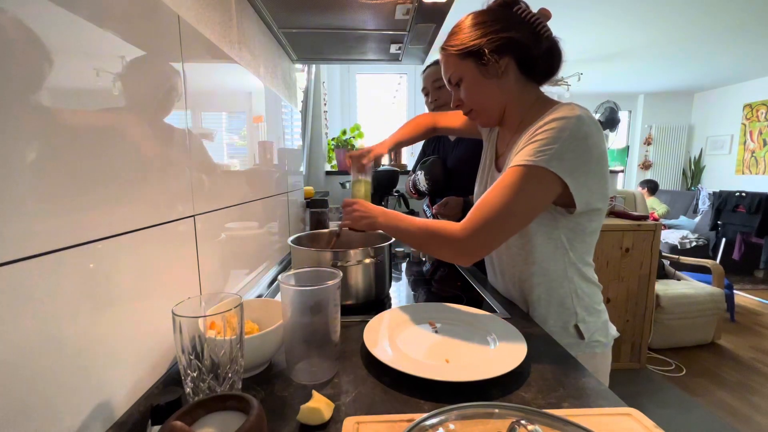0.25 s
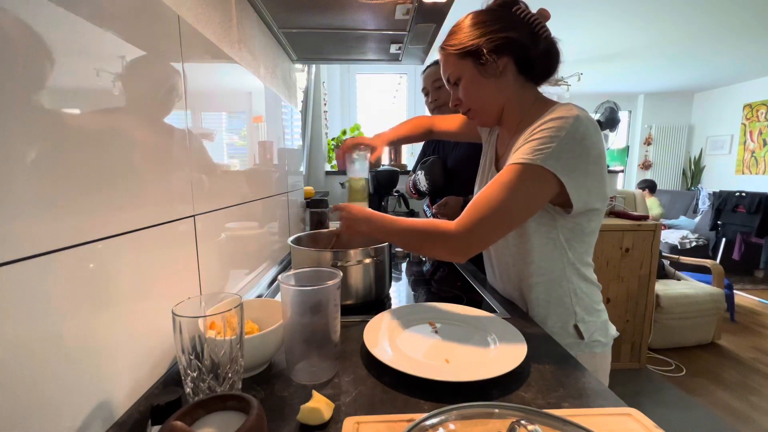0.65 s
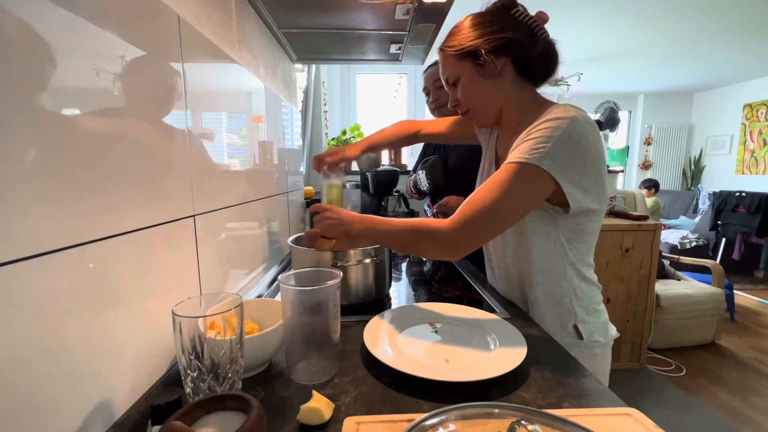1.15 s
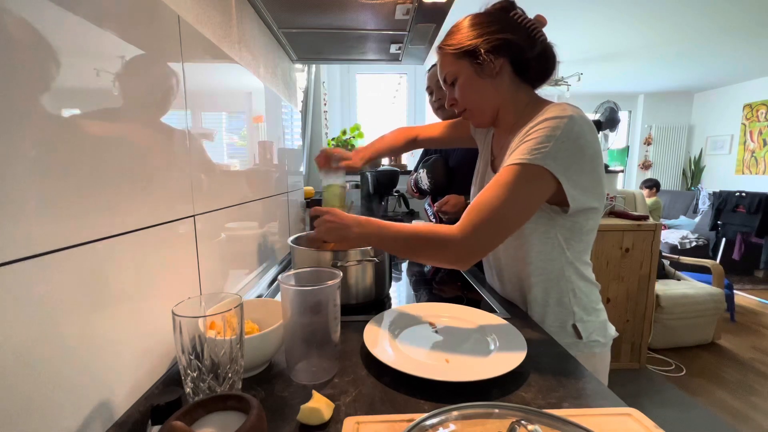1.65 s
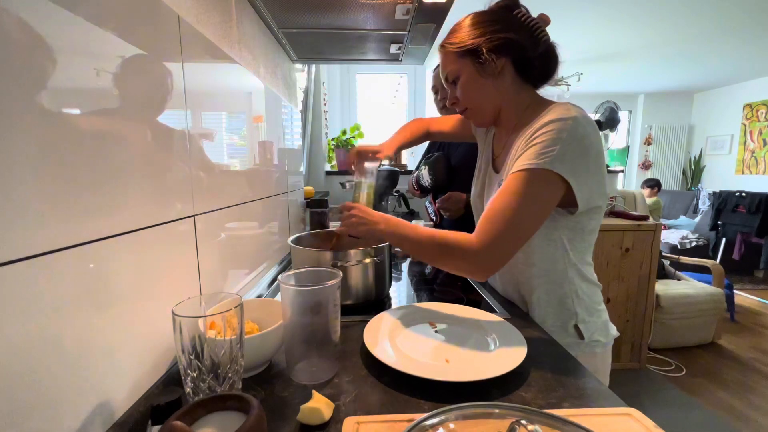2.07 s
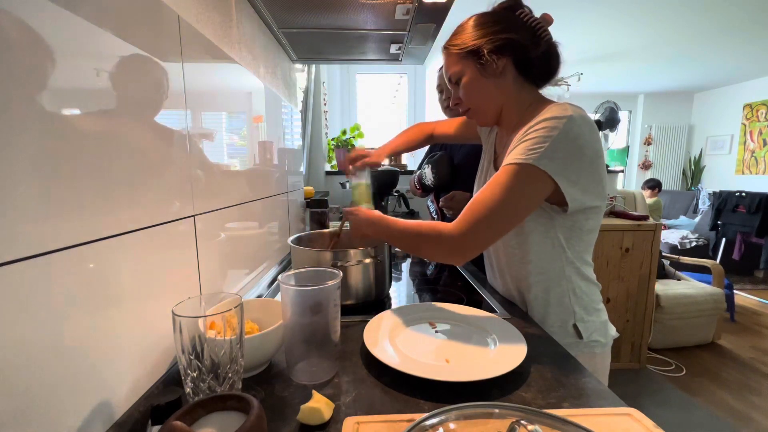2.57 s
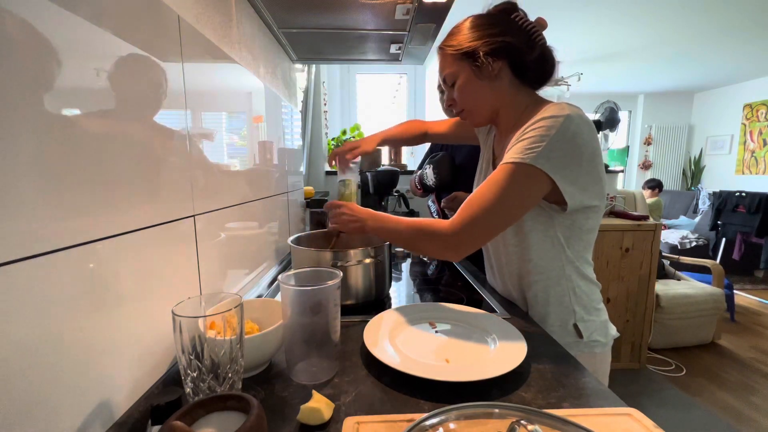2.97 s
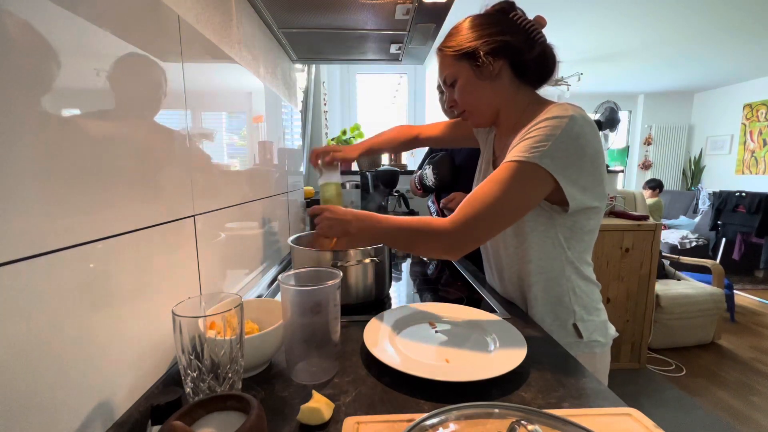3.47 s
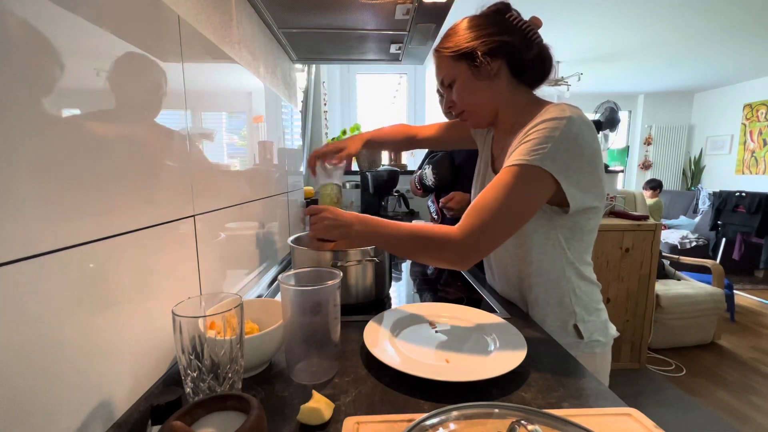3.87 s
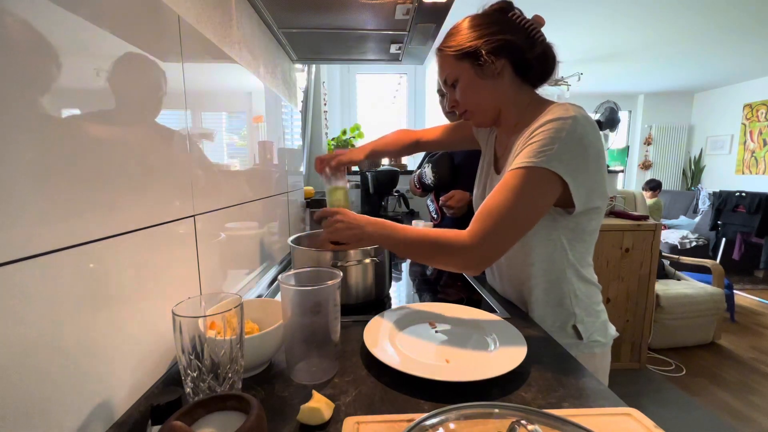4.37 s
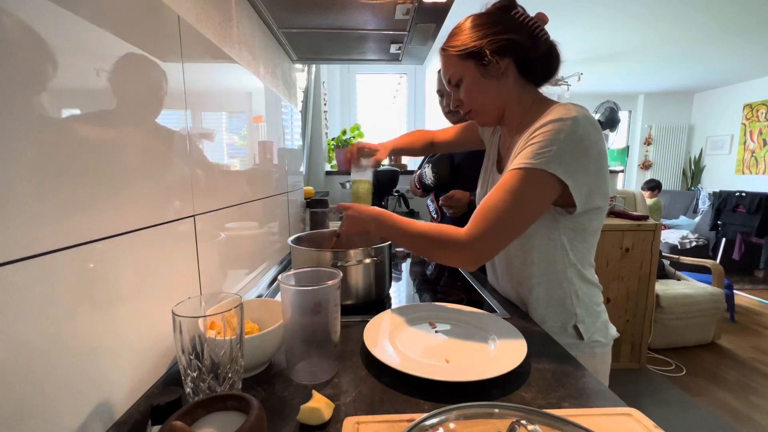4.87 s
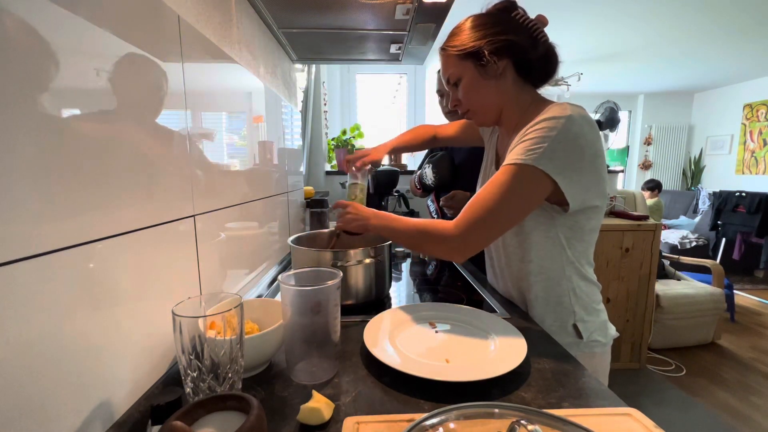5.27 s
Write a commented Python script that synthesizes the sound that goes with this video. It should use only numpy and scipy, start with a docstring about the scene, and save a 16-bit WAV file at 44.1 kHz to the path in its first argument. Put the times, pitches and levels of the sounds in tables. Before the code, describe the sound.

Rhythmic crunching clicks of a pepper grinder, with soft hand rustles between twists and a faint low room hum.

```python
"""A hand pepper mill is twisted about three times a second over a steel pot in a tiled kitchen.
Each twist cracks corns (clicks with splinters) and crushes grit (dense random grains); this force
excites resonant modes of mill and pot, and the room answers with echoes and a decaying tail.
Between twists the hand regrips with a soft rustle of sparser grains; dull bumps are short sine pushes.
The hands rumble in low band noise, over a low hum and flickering noise bands with a narrow steady whir."""
import sys
import numpy as np
from scipy import signal
from scipy.fft import rfft, irfft
from scipy.io import wavfile

SR = 44100
rng = np.random.default_rng(int(sys.argv[2]) if len(sys.argv) > 2 else 0)


def dump_mix(stems):
    """Bounce the given channels to the path in sys.argv[1] as a 16-bit WAV at rate SR."""
    frames = np.atleast_2d(stems).T  # one column per channel
    limited = np.clip(frames, -1, 1)  # hard clip at full scale
    pcm = np.round(limited * 32767).astype(np.int16)
    wavfile.write(sys.argv[1], SR, pcm)


N = 243413


def from_db(db):
    """Logarithmic level: 20 dB is a factor of ten in amplitude."""
    return 10 ** (np.asarray(db) / 20)


def rms_one(x):
    """Normalization to unit mean power."""
    return x / np.sqrt(np.mean(x ** 2) + 1e-20)


def at_hz(points, hz):
    """Interpolation of a spectrum table on a logarithmic frequency axis."""
    table = np.array(points)
    return np.interp(np.log(hz), np.log(table[:, 0]), table[:, 1])


def band(x, low_hz, high_hz, order=2):
    """Band-pass filtering with a maximally flat passband."""
    edges = [low_hz, min(high_hz, 0.45 * SR)]
    return signal.sosfilt(signal.butter(order, edges, "band", fs=SR, output="sos"), x)


def drift(rate_hz):
    """Slow random modulation: noise through a two-pole low-pass, unit rms before interpolation."""
    step = 40   # samples between computed points
    pole = np.exp(-2 * np.pi * rate_hz * step / SR)
    noise = rng.standard_normal(N // step + 2002)
    slow = signal.lfilter([1], [1, -2 * pole, pole * pole], noise)[2000:]   # drop the filter's start
    return np.interp(np.arange(N) / step, np.arange(len(slow)), rms_one(slow))


def grains(per_s, spread_db):
    """Shot noise: random clicks with exponentially distributed levels and random sign, rms 1."""
    sizes = from_db(spread_db * np.minimum(rng.exponential(1, N), 5)) * rng.choice([-1, 1], N)
    return rms_one(sizes * (rng.random(N) < per_s / SR))


def colour(x, spectrum):
    """Minimum-phase filtering: folding the cepstrum makes a magnitude causal; taps have unit power."""
    size = 4096
    freqs = np.maximum(np.arange(size // 2 + 1) * SR / size, 1)
    cepstrum = irfft(np.log(from_db(at_hz(spectrum, freqs))))
    cepstrum[1:size // 2] *= 2
    cepstrum[size // 2 + 1:] = 0
    taps = irfft(np.exp(rfft(cepstrum)))[:size // 2]
    return signal.oaconvolve(x, taps / np.sqrt(np.sum(taps ** 2)))[:len(x)]


# Spectrum used to colour the grain noise: (frequency [Hz], relative density [dB per Hz])
GRAIN_SPECTRUM = [(88, -48), (150, -6.5), (431, -17.5), (589, -10), (979, -7), (1080, -5.5), (2100, -7.5),
                  (3290, 2.5), (4320, -6), (8730, -6), (10200, -24.5), (11900, -10.5), (13700, -32.5),
                  (14500, -22.5), (16000, -15)]
SPLIT_HZ, AIR_HZ = 2000, 10000   # body below, crush between, air above


def three_parts(x):
    """Band splitting: coloured body, crush and air ranges of a click train, each rms 1."""
    x = colour(x, GRAIN_SPECTRUM)
    ranges = [(260, SPLIT_HZ), (SPLIT_HZ, AIR_HZ), (AIR_HZ, 19000)]
    return [rms_one(band(x, low, high, order=3)) for low, high in ranges]


# Left-right correlation of diffuse sound: (frequency [Hz], correlation [0 to 1])
EAR_CORRELATION = [(30, .6), (80, 0.64), (250, 0.69), (600, 0.017), (8000, 0.0087), (12000, 0.16)]


def stereo(mid, side, hz):
    """Interaural correlation: weighted sum and difference of independent noises, as (left, right)."""
    alike = np.clip(at_hz(EAR_CORRELATION, hz), 0, 1)
    shared, opposed = np.sqrt(1 + alike) * mid, np.sqrt(1 - alike) * side
    return np.stack([shared + opposed, shared - opposed])


# Background hiss and rumble: (frequency [Hz], relative density [dB per Hz])
FLOOR_SPECTRUM = [(25, -10), (53, -13.5), (82, -7), (108, 2), (150, -18), (290, -17.5), (451, -29.5),
                  (700, -27), (1100, -18.5), (1700, -8.5), (2700, -36), (4500, -25.5), (6400, -15.5),
                  (9000, -32), (16000, -68)]
# Low hum before the left-right lean: (frequency [Hz], level before flicker [dB rms])
HUM_TONES = [(100, -71)]
FLOOR_DB = -62.5   # rms before the left-right lean
WHIR_LOW_HZ, WHIR_HIGH_HZ, WHIR_DB = 1520, 2070, -65.5   # narrow steady whir, rms before the lean


def room_noise(patchy_db):
    """Filtered noise: third-octave bands, each flickering, with a narrow steady whir and a mains hum."""
    floor, edges = 0, 25 * 2 ** np.arange(0, 9.5, 1 / 3)
    white = rng.standard_normal((2, 2, N))   # neighbouring bands use independent noise
    for k, (low, high) in enumerate(zip(edges, edges[1:])):
        mid, side = band(white[k % 2], low, high)
        hz = np.sqrt(low * high)
        gain = from_db(at_hz(FLOOR_SPECTRUM, hz) + patchy_db * drift(6))
        floor = floor + gain * stereo(mid, side, hz)
    whir_noise = band(rng.standard_normal((2, N)), WHIR_LOW_HZ, WHIR_HIGH_HZ, order=3)
    whir = from_db(WHIR_DB) * rms_one(whir_noise)
    t, hum = np.arange(N) / SR, 0
    for hz, db in HUM_TONES:
        hum = hum + from_db(db + 0.83 * drift(7.6)) * np.sqrt(2) * np.sin(2 * np.pi * hz * t)
    return (from_db(FLOOR_DB) * rms_one(floor) + whir + hum) * from_db([[1.5], [-1.5]])


RUMBLE_LOW_HZ, RUMBLE_HIGH_HZ = 61, 208
RUMBLE_DB = -65   # rms before the pause and the left-right lean
REST_START_S, REST_END_S = 4.58, 4.88   # the handling rumble pauses


def handling(lumpy_db):
    """Amplitude-modulated band noise: working hands shake the counter; the rumble stops for a moment."""
    t = np.arange(N) / SR
    corners = [REST_START_S - 0.03, REST_START_S, REST_END_S, REST_END_S + 0.02]
    busy = np.interp(t, corners, [1, 0, 0, 1])
    lumpy_noise = rng.standard_normal(N) * from_db(lumpy_db * drift(17.6))
    return from_db(RUMBLE_DB) * busy * rms_one(band(lumpy_noise, RUMBLE_LOW_HZ, RUMBLE_HIGH_HZ))


# The hand sliding back between twists:
# (start [s], length [s], hiss level at the mill [dB], body level over the hiss [dB])
HAND_SLIDES = [(0.0, 0.061, -63, 5.5), (0.295, 0.2, -66.5, 5), (0.63, 0.14, -68, 2.5),
               (0.94, 0.19, -61, -2), (1.197, .11, -60.5, 0.5), (1.5, 0.18, -60, 1.5),
               (1.86, 0.18, -59, -4), (2.158, 0.092, -55.5, -12), (2.44, .12, -59, -7),
               (2.728, 0.16, -62, -4), (3.004, .14, -64.5, 2), (3.296, 0.066, -65, 1),
               (3.583, 0.062, -62.5, 2), (3.9, 0.28, -64, 3.5), (4.194, 0.13, -65.5, 2.5),
               (4.63, 0.034, -63.5, -6.5), (4.858, .04, -71, -5), (5.03, 0.21, -65.5, -6),
               (5.344, 0.072, -64.5, 4)]


def regrip(edge_s):
    """Friction as sparse grain noise: skin and loose corns rustle; each slide fades in and out."""
    t, hiss_gain, body_gain = np.arange(N) / SR, np.zeros(N), np.zeros(N)
    for start, length, hiss_db, body_db in HAND_SLIDES:
        corners = [start - edge_s, start, start + length, start + length + edge_s]
        slide = from_db(hiss_db) * np.interp(t, corners, [0, 1, 1, 0])
        hiss_gain += slide
        body_gain += from_db(body_db) * slide
    body, mid, air = three_parts(grains(2500, spread_db=5.5) * from_db(0.71 * drift(18)))
    return body_gain * body + hiss_gain * (mid + 0.26 * air)


def ring(clicks, hz, t60):
    """Damped resonance: a unit click sets off a decaying sine of initial amplitude 1."""
    r, w = from_db(-60 / (t60 * SR)), 2 * np.pi * hz / SR
    return signal.lfilter([0, np.sin(w)], [1, -2 * r * np.cos(w), r * r], clicks + 1e-18)


# Modes of mill and pot: (frequency [Hz], level relative to the common ring level [dB], T60 [s])
MILL_AND_POT_MODES = [(294, -11.5, 0.26), (340.2, -9, 0.12), (610, -11.5, 0.1), (649, -22.5, 0.49),
                      (858, -16.5, 0.29), (1074.7, -8, 0.1), (1101.5, -3.5, 0.061), (1188, -14.5, 0.052),
                      (1438, -5, 0.051), (1486.5, -9, 0.099), (2040, -16.5, 0.18), (2880, -12, 0.0096),
                      (3430, -4.5, 0.01), (3430, -20, 0.044), (6400, 3, 0.018), (5570, -10, 0.015)]


def mill_and_pot(force, ring_db, grip_db):
    """Modal synthesis: the force drives every mode; the shifting grip varies each drive."""
    total = np.zeros(N)
    for k, (hz, db, t60) in enumerate(MILL_AND_POT_MODES):
        drive = force * from_db(grip_db * drift(5.1))
        total += (-1) ** k * from_db(db + ring_db) * ring(drive, hz, t60)   # alternate polarity
    return total


# Reverberation time of the kitchen: (frequency [Hz], T60 [s])
REVERB_TIME = [(150, 0.41), (500, 0.31), (2000, 0.35), (6000, 0.4), (14000, 0.28)]


def echoes(near_db, tail_db, near_s, count):
    """Statistical reverberation: close echoes off tiles and pot, then a tail dying band by band."""
    t = np.arange(int(0.55 * SR)) / SR
    white = rng.standard_normal((2, 2, count, len(t)))
    response = np.zeros((2, count, len(t)))   # ear, source spot, time
    edges = 100 * 2 ** np.arange(0, 7.6, 0.5)
    for k, (low, high) in enumerate(zip(edges, edges[1:])):
        hz = np.sqrt(low * high)
        mid, side = band(white[k % 2], low, high)
        tail = from_db(tail_db - 60 * t / at_hz(REVERB_TIME, hz))
        near = from_db(near_db) * np.exp(-t / near_s)
        response += (tail + near) * (t > 0.0012) * stereo(mid, side, hz)
    return response


# Interaural level difference: (frequency [Hz], left over right [dB])
LEFT_OVER_RIGHT = [(60, 14), (99, -8), (160, 8.5), (270, 0), (450, -3.5), (740, -2.5), (1220, 3.5),
                   (2010, 1), (3330, 1.5), (5500, 17.5), (9080, -2), (15000, 2)]


def kitchen(x, near_db, tail_db, near_s, sway_rate):
    """Precedence and time-varying echoes: left ear leads; swaying mill and hands change the paths."""
    paths = echoes(near_db, tail_db, near_s, count=5)
    shares = np.array([drift(sway_rate) for _ in paths[0]])
    shares /= np.sqrt(np.sum(shares ** 2, axis=0))   # constant total power
    heard = signal.oaconvolve((x * shares)[None], paths, axes=2)[:, :, :N].sum(axis=1)
    heard += [x, np.roll(x, 12)]   # direct sound, right ear 12 samples later
    freqs = np.maximum(np.arange(N // 2 + 1) * SR / N, 1)
    tilt = from_db(at_hz(LEFT_OVER_RIGHT, freqs) / 2 * np.array([[1], [-1]]))
    return irfft(rfft(heard) * tilt, N)


# Twists: (start [s], length [s], crush level at the mill at the start [dB],
# the same at the end [dB], body level over the crush [dB])
MILL_TWISTS = [(0.125, 0.087, -37, -35, 0.5), (0.448, 0.086, -39.5, -37, 1.5), (0.761, 0.074, -37, -34, 3),
               (1.051, 0.076, -43, -37.5, 1), (1.328, 0.083, -38.5, -37.5, 1),
               (1.632, 0.072, -40, -34.5, 1), (1.948, 0.064, -27.5, -32.5, -1),
               (2.232, 0.063, -29.5, -35.5, -1), (2.521, 0.12, -43.5, -40, 3.5),
               (2.848, 0.067, -44, -35.5, -3.5), (3.147, 0.11, -33.5, -47, -1),
               (3.429, 0.12, -40.5, -43.5, 2.5), (3.734, 0.088, -28.5, -37, -0.5),
               (4.021, 0.077, -42, -24, -4), (4.331, 0.03, -46, -30, 0), (4.892, 0.05, -37.5, -41, 1.5),
               (5.18, .085, -42, -38.5, 3.5), (5.454, 0.066, -52, -37, 2.5)]
BITE_S, STOP_DB_PER_S = 0.0055, 596   # the burrs bite at once and run out when the hand stops
TAKE_UP_S, TAKE_UP_DB = 0.013, -14.5   # slack taken up before the bite, level under the twist's start
CRACKLES_PER_S, CRACKLE_DB = 300, -4.5   # small fragments snapping among the grit


def crush(air_db):
    """Granular fracture: dense grit grains under each twist's effort, dying fast when it stops."""
    t, crush_gain, body_gain = np.arange(N) / SR, np.zeros(N), np.zeros(N)
    for start, length, start_db, end_db, body_db in MILL_TWISTS:
        end = start + length
        effort_db = np.interp(t, [start, end], [start_db, end_db])
        effort_db -= STOP_DB_PER_S * np.maximum(t - start - length, 0)
        effort = np.clip((t - start) / BITE_S, 0, 1) * from_db(effort_db)
        rise = np.exp(-np.abs(t - start) / TAKE_UP_S)
        take_up = (t < start) * from_db(start_db + TAKE_UP_DB) * rise
        crush_gain += effort + take_up
        body_gain += from_db(body_db) * effort
    grit = grains(7000, spread_db=6.5) * from_db(2.6 * drift(99))
    crackle = from_db(CRACKLE_DB) * grains(CRACKLES_PER_S, spread_db=2.0)
    body, mid, air = three_parts(grit + crackle)
    return body_gain * body + crush_gain * (mid + from_db(air_db) * air)


# Corns cracking and ticking:
# (time [s], peak level of the click at the mill [dB], body level over the peak [dB])
CORN_CRACKS = [(0.1248, -20.5, -7), (0.162, -23.5, 3), (0.182, -16.5, -1), (0.213, -26, -1),
               (0.452, -27, 2), (0.4852, -15.5, -16), (0.543, -32, 4), (0.6864, -41, -17),
               (0.7552, -30, -4), (0.7704, -11.5, -13.5), (0.778, -12.5, -22), (1.035, -31, -13),
               (1.0596, -27.5, -2), (1.0735, -19, -23), (1.326, -18, -22), (1.3519, -16, -10),
               (1.3839, -12.5, -9.5), (1.5927, -38.5, -42), (1.6428, -13.5, -10), (1.6992, -33.5, 17.5),
               (1.872, -37, -11), (1.8996, -32, -23), (1.9409, -14, -5.5), (1.9846, -16, -5),
               (2.019, -24, -4), (2.2351, -12.5, -6.5), (2.248, -22, -2), (2.3046, -15, -24),
               (2.5425, -15.5, -9.5), (2.5972, -17, -6), (2.6438, -22.5, 2), (2.8474, -24, -6.5),
               (2.863, -15, -2.5), (2.8922, -17.5, -0.5), (2.905, -25.5, 6.5), (3.1529, -15, -6),
               (3.184, -32.5, 11), (3.218, -25.5, 2), (3.4348, -17.5, -4.5), (3.489, -25.5, -0.5),
               (3.519, -33.5, 0.5), (3.711, -53, -11.5), (3.7371, -12.5, -10.5), (3.747, -15.5, -4),
               (3.7708, -10, -8), (4.012, -43.5, -4.5), (4.0333, -21.5, -1.5), (4.069, -3.5, -7.5),
               (4.335, -18, -2), (4.3732, -9.5, -4.5), (4.8964, -23, -27), (4.925, -29, -5),
               (5.115, -42.5, -25), (5.1892, -24, -51), (5.221, -14.5, -2), (5.27, -18, -10),
               (5.469, -41, 9.5), (5.501, -32, 9)]
CRACK_AIR_DB = -4.5   # treble of a crack over its peak
CRUMBLE_S, CRUMBLE_DB = 0.017, -14   # the broken corn goes on crumbling


def cracks(shatter_s, splinter_db):
    """Brittle fracture: an impulse, then splinter grains under a fast and a slower exponential decay."""
    times, db, body_db = np.transpose(CORN_CRACKS)
    t = np.arange(int(0.08 * SR)) / SR
    fade = np.exp(-t / shatter_s) + from_db(CRUMBLE_DB) * np.exp(-t / CRUMBLE_S)
    splinters = from_db(splinter_db) * grains(6000, spread_db=4.5)
    out = np.zeros(N)
    parts = three_parts(signal.unit_impulse(4096))
    for part, level_db in zip(parts, [db + body_db, db, db + CRACK_AIR_DB]):
        snaps = np.zeros(N)
        snaps[(times * SR).astype(int)] = from_db(level_db)
        burst = snaps + splinters * signal.oaconvolve(snaps, fade)[:N]
        out += signal.oaconvolve(burst, part / np.abs(part).max())[:N]
    return out


# Dull bumps before the left-right lean: (time [s], peak level [dB], frequency [Hz])
DULL_BUMPS = [(0.16, -47.5, 131), (0.377, -49.5, 100), (0.56, -58, 115), (0.68, -55, 123), (0.84, -54, 92),
              (0.97, -57, 123), (1.054, -60, 110), (1.279, -53.5, 118), (1.4, -45, 111),
              (1.573, -49.5, 122), (1.696, -46, 100), (1.869, -65, 159), (2.126, -51.5, 102),
              (2.159, -55, 113), (2.184, -62, 105), (2.469, -58, 98), (2.496, -51.5, 110),
              (2.648, -44, 124), (2.765, -53, 140), (2.894, -46, 114), (3.074, -55, 106), (3.239, -48, 140),
              (3.51, -48, 125), (3.6, -57, 70), (3.799, -55, 71), (3.962, -47, 100), (4.238, -50, 116),
              (4.278, -60, 107), (4.522, -59, 106), (4.559, -68, 111), (4.916, -50.5, 109),
              (5.15, -49, 134), (5.421, -48, 101)]


def bumps(cycles):
    """Heavily damped oscillation: pushes through hand and counter swell and die in a few cycles."""
    out = np.zeros(N)
    for start, db, hz in DULL_BUMPS:
        turns = np.arange(int(0.12 * SR)) / SR * hz
        push = np.sin(2 * np.pi * turns) * turns * np.exp(-turns / cycles)
        at = int(start * SR)
        out[at:at + len(turns)] += (from_db(db) * push / np.abs(push).max())[:N - at]
    return out


DISTANCE_LOSS_DB = -9   # from the mill to the listener


def scene():
    """Superposition: mill through the kitchen, with bumps, handling and room noise on top."""
    force = crush(air_db=-8.0) + cracks(shatter_s=0.00097, splinter_db=-13.0) + regrip(edge_s=0.043)
    # the force carries no deep bass
    force = from_db(DISTANCE_LOSS_DB) * band(force, 130, 19000, order=3)
    mill = force + mill_and_pot(force, ring_db=-35, grip_db=2.0)
    room = kitchen(mill, near_db=-16.5, tail_db=-32.5, near_s=0.0049, sway_rate=17.4)
    hands = (bumps(cycles=0.94) + handling(lumpy_db=3.5)) * from_db([[1.5], [-1.5]])   # leans left
    return room + hands + room_noise(patchy_db=4.0)


CUTOFF_HZ = 16900


def record(dry):
    """Low-pass filtering: the top is cut steeply."""
    return signal.sosfilt(signal.cheby2(12, 70, CUTOFF_HZ, fs=SR, output="sos"), dry)


dry = scene()
out = record(dry)
dump_mix(out)
```